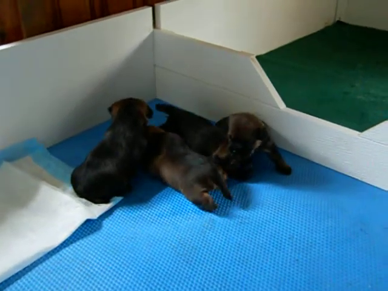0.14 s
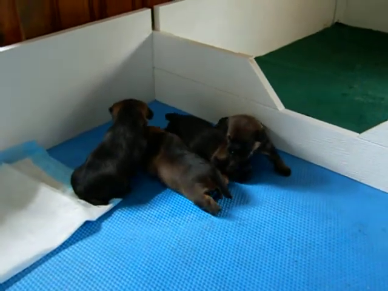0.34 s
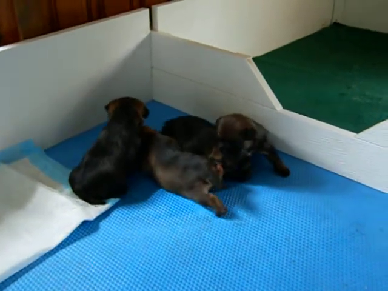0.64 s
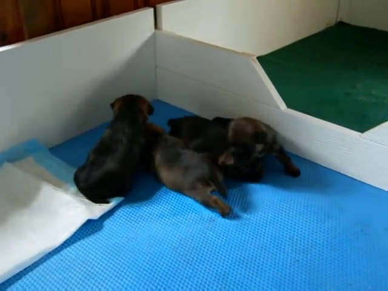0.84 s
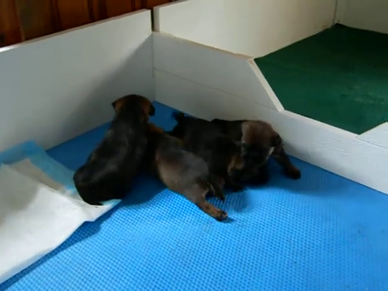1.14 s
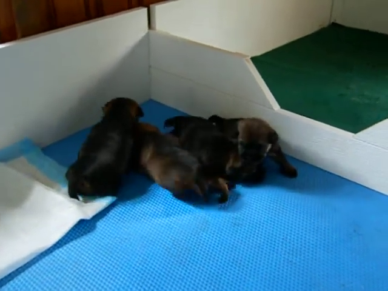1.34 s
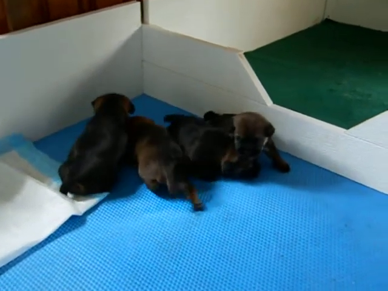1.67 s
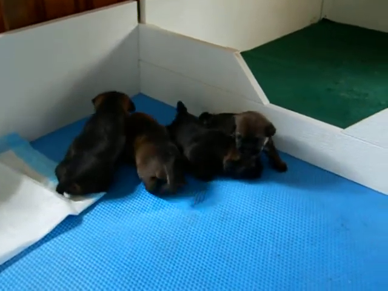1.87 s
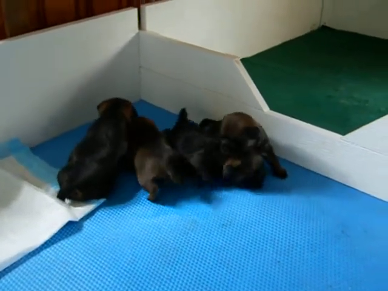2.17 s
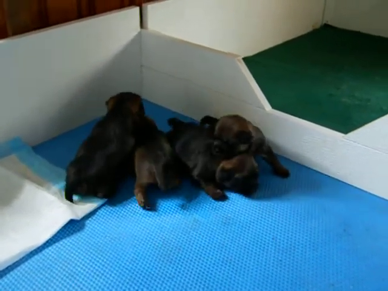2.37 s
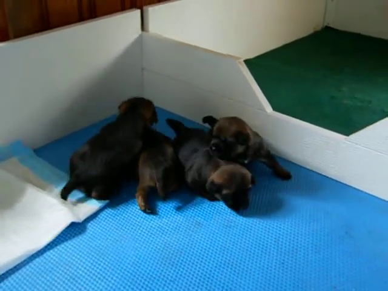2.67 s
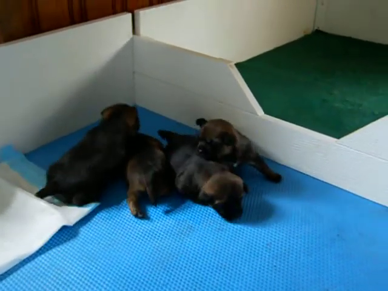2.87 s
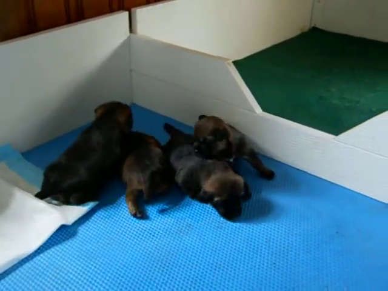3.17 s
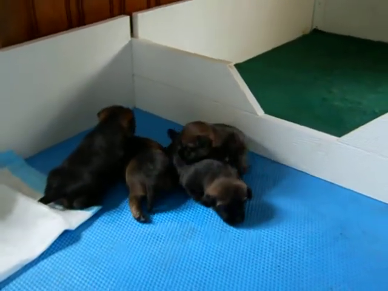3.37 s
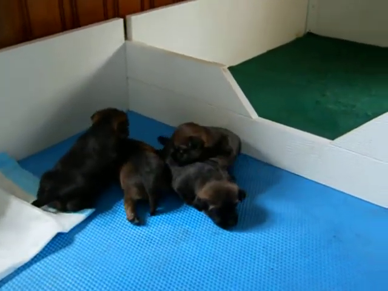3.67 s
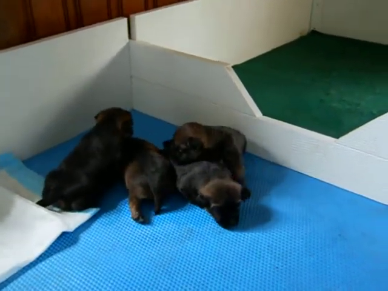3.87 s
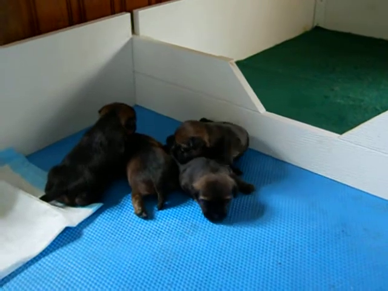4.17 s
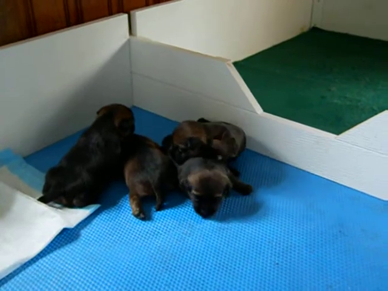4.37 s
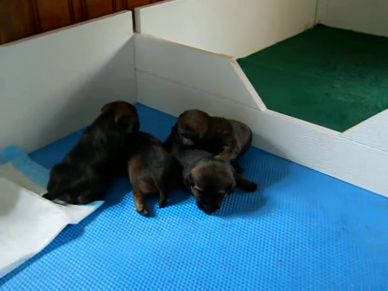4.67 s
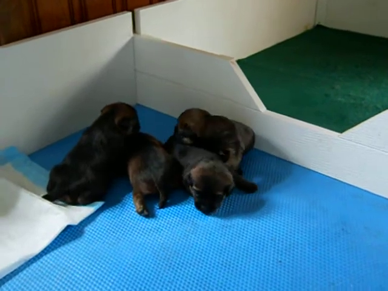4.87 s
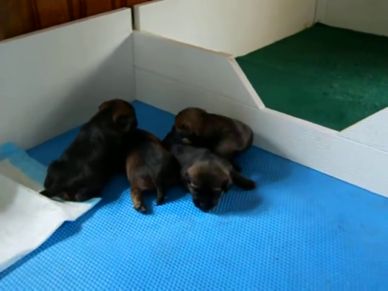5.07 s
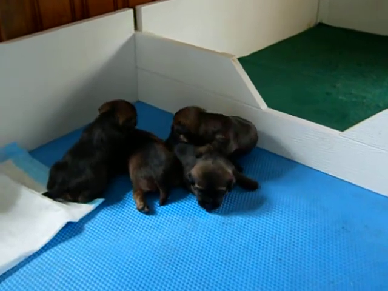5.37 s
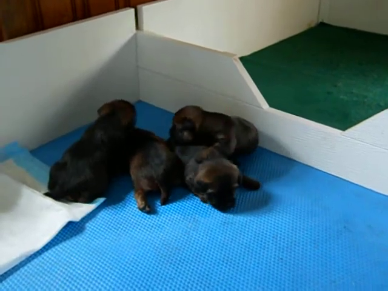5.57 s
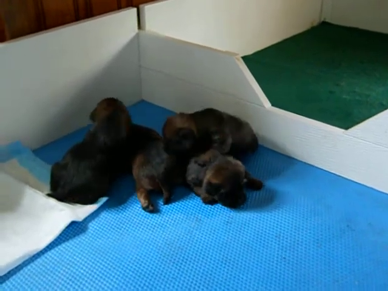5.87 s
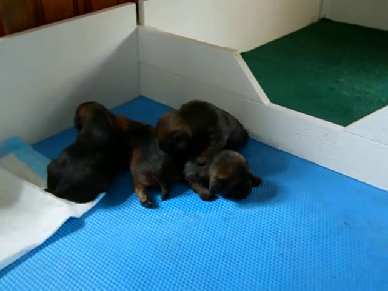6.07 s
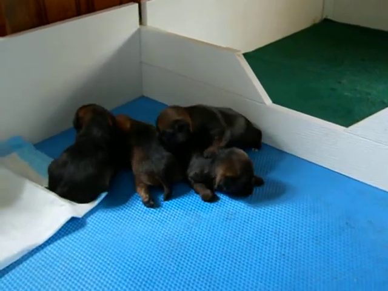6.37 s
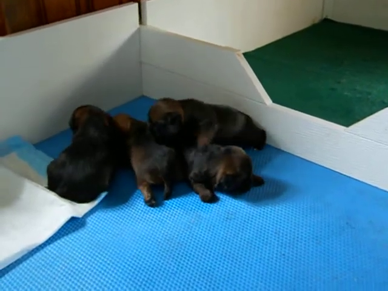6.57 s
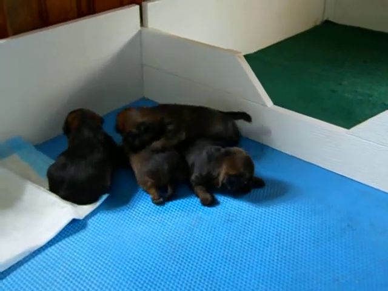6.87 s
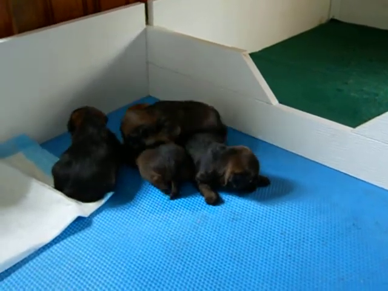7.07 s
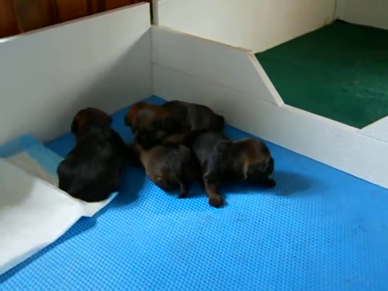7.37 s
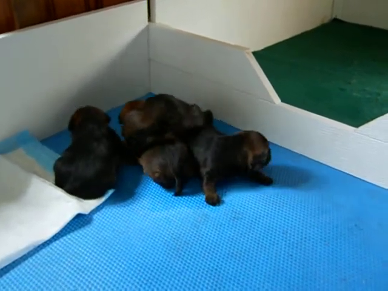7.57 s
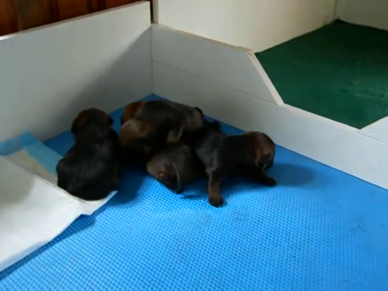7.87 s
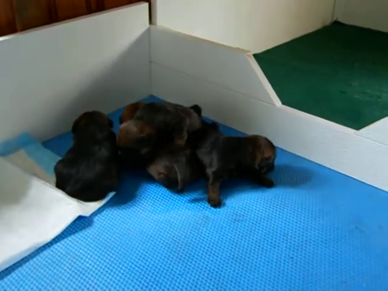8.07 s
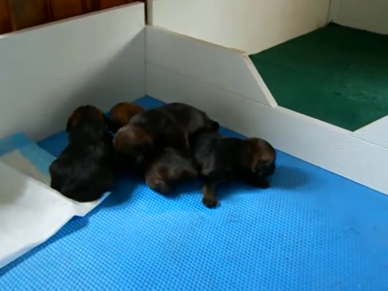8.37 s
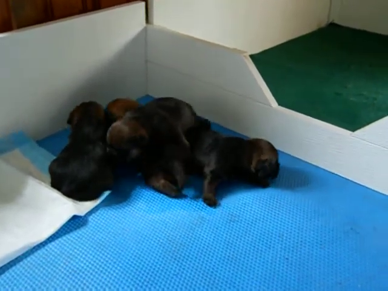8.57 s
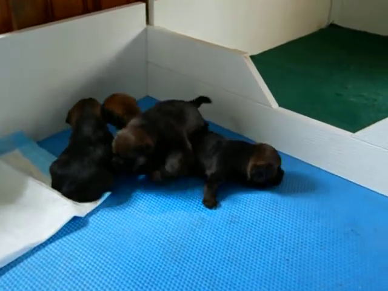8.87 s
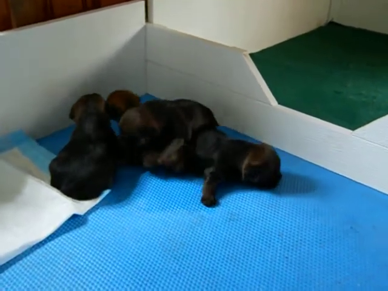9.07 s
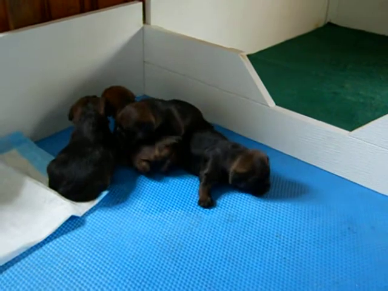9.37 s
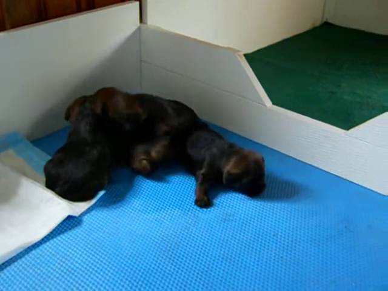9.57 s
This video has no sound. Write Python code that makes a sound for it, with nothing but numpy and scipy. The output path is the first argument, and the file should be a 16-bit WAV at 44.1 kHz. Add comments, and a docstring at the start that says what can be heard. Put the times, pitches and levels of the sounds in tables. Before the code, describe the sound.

Young puppies squeak, whine and grunt, then give a throbbing wail that sinks into a small growl, with paws scuffing a rubber mat.

```python
"""Young puppies in a wooden whelping pen, a metre or two from a small microphone.
Over the room's hiss and an appliance's hum, paws scuff the rubber mat; a hoarse peep, a claw tick
and soft grunts follow. From two seconds in, vocal folds whistle in near-pure glides: squeaks, whines,
then a throbbing wail and a low moan that sink into a growl of slack, flapping folds. Stray grunts,
scuffs and ticks close the scene. The pen boards and room walls throw back short echoes throughout."""
import sys
import numpy as np
from scipy import signal
from scipy.fft import rfft, irfft
from scipy.io import wavfile

SR = 44100
rng = np.random.default_rng(int(sys.argv[2]) if len(sys.argv) > 2 else 0)


def log_audio(samples):
    """Write samples as a 16-bit WAV file to the path given in sys.argv[1]."""
    # one column per channel
    frames = np.atleast_2d(samples).T
    # limit to full scale, then quantise
    limited = np.clip(frames, -1, 1)
    pcm = np.round(limited * 32767).astype(np.int16)
    wavfile.write(sys.argv[1], SR, pcm)


N = 429516
BIN_HZ = np.maximum(np.fft.rfftfreq(N, 1 / SR), 1)
PURE, CLEAR, HUSKY, RASPY, CRACKED = .015, .05, .12, .22, .5  # hoarseness of a voice, 0-1


def undb(db):
    """Decibels to gain."""
    return 10 ** (np.asarray(db) / 20)


def unit(x):
    """Scale to rms 1."""
    return x / np.sqrt(np.mean(x ** 2) + 1e-18)


def gain_at(hz, points):
    """Gain of a (frequency [Hz], level [dB]) outline on a log-frequency axis."""
    points_hz, db = np.transpose(points)
    return undb(np.interp(np.log(hz), np.log(points_hz), db))


def band(x, hz, width_hz):
    """A resonance applied twice, for steep flanks."""
    b, a = signal.iirpeak(hz, hz / width_hz, fs=SR)
    return signal.lfilter(b, a, signal.lfilter(b, a, x))


def wander(size, hz):
    """Smooth random drift of rms 1, changing up to about hz times a second."""
    lowpass = signal.butter(2, hz, fs=SR, output="sos")
    return unit(signal.sosfilt(lowpass, rng.standard_normal(size + SR // 10))[-size:])


def add(out, start, x):
    """Mix x into out at a time in seconds."""
    i = max(int(start * SR), 0)
    out[i:i + len(x)] += x[:len(out) - i]


def room_tone(air_db=-39, hum_db=5, waver=.1):
    """Even hiss and the slightly wavering hum of a household appliance."""
    # spectrum of the hiss: (frequency [Hz], relative density [dB])
    air_spectrum = [(20, -6.5), (60, -8), (90, -14), (125, -3.5), (160, -11), (350, -10), (720, -11.5),
                    (1280, -14), (3000, -16.5), (7400, -20)]
    # tones of the appliance: (frequency [Hz], relative level [dB])
    hum_tones = [(59.2, -60.5), (118.4, -58.5), (199.2, -56.5)]
    spectrum = rfft(rng.standard_normal(N)) * gain_at(BIN_HZ, air_spectrum)
    air = irfft(spectrum, N) / np.std(irfft(spectrum * (BIN_HZ > 250), N))  # rms 1 above 250 Hz
    hum, t = np.zeros(N), np.arange(N) / SR
    for hz, db in hum_tones:
        level = undb(db) * (1 + waver * wander(N, 8.6))
        hum += level * np.sin(2 * np.pi * hz * t + .32 * wander(N, 5.2))
    return undb(air_db) * air + np.sqrt(2) * undb(hum_db) * hum


def scuffs(grain_db=4, centre_hz=4000, width_hz=5500):
    """A paw drags over the ribbed mat: grainy friction that swells fast and dies away."""
    # paw strokes: (start [s], half-length [s], relative level [dB])
    strokes = [(0.037, 0.098, -41), (0.206, 0.077, -41), (.49, 0.065, -43.5), (0.727, 0.16, -40.5),
               (1.009, 0.042, -34.5), (1.245, 0.1, -41.5), (1.366, 0.083, -39), (1.796, 0.042, -40),
               (1.837, 0.069, -38.5), (2.12, 0.073, -42), (2.303, 0.094, -42.5), (6.606, 0.029, -40),
               (6.78, 0.042, -39), (7.043, .03, -35), (7.104, 0.032, -38), (8.107, 0.022, -38.5),
               (9.156, 0.033, -39), (9.618, 0.017, -39)]
    out = np.zeros(N)
    for start, half_length, db in strokes:
        progress = np.linspace(0, 1, int(2 * half_length * SR))
        grains = rng.standard_normal(len(progress)) * undb(grain_db * wander(len(progress), 250))
        swell = np.interp(progress, [0, .12, .4, .65, 1], [.65, 1, 1, .1, .33])
        add(out, start, unit(band(grains, centre_hz, width_hz)) * swell * undb(db))
    return out


def pen(x, room_db=-12, gap_s=.0048, t60_s=.26):
    """Hard boards give a few close echoes; the room adds a short tail."""
    # echoes off the pen boards and room walls: (delay [s], level re direct sound [dB])
    echoes = [(.0031, -22.5), (.0078, -13), (0.0131, -15.5), (.022, -10.5)]
    t = np.arange(SR // 2) / SR
    tail = rng.standard_normal(len(t)) * np.exp(-np.log(1000) * t / t60_s) * (t > gap_s)
    response = undb(room_db) * tail / np.linalg.norm(tail)
    response[0] = 1
    for delay, db in echoes:
        response[int(delay * SR)] += undb(db)
    return signal.fftconvolve(x, response / np.linalg.norm(response))[:N]


def cry(glide, hoarse, octave_db, bright_db, quiver, tract=(), throbs=None,
        open_db=-50, mouth_hz=4900, mouth_width_hz=1000, edge_s=.005, catch_s=.022):
    """The vocal folds whistle on a gliding pitch, quiver, and turn uneven when the voice is hoarse."""
    # the voice roughens as it sinks: (pitch [Hz], extra roughness [0-1])
    sinking = [(420, .16), (800, .1), (1000, 0)]
    # upper harmonics as throat and muzzle pass them: (frequency [Hz], gain [dB])
    muzzle_response = [(1200, -7), (1900, -13), (2600, -16.5), (3300, -27), (4500, -35), (6000, -25.5),
                       (7200, -20.5), (8000, -12), (9500, -25)]
    times, pitches, levels = np.transpose(glide)
    t = np.arange(times[0] - edge_s / 2, times[-1] + edge_s / 2, 1 / SR)
    hz, db = np.interp(t, times, pitches), np.interp(t, times, levels)
    from_edge = np.minimum(t - t[0], t[-1] - t)
    catch = .25 * np.exp(-from_edge / catch_s)  # the folds catch as the cry starts and stops
    rough = hoarse + catch + np.interp(hz, *np.transpose(sinking))
    # the octave swells across resonances of nose and throat, and thins away at high pitch
    swell_db = sum(boost * np.exp(-((2 * hz - centre) / width) ** 2) for centre, width, boost in tract)
    thin_db = .03 * np.maximum(hz - 1850, 0)
    fundamental, octave = undb(db), undb(db + octave_db + swell_db - thin_db)
    effort = np.hypot(fundamental, octave)
    jitter = .07 * rough * wander(len(t), 330)
    tremble = throb(t, *throbs) if throbs else 0
    hz = hz * (1 - tremble + quiver * wander(len(t), 46) + jitter)
    phase = 2 * np.pi * np.cumsum(hz) / SR
    voice = fundamental * np.sin(phase) + octave * np.sin(2 * phase)
    # at low pitch, slack folds alternate strong and weak cycles, which sounds between the harmonics
    slack = np.clip((1400 - hz) / 300, 0, 1)
    voice += .5 * rough * slack * effort * (np.sin(1.5 * phase) + .5 * np.sin(2.5 * phase))
    dull = undb(-.17 * np.maximum(520 - hz, 0))  # the mouth closes below 520 Hz
    for k in range(3, 8):
        # upper harmonics weaken, but swell across a resonance of the open mouth or the muzzle
        mouth = undb(open_db) / (k - 2) * np.exp(-((k * hz - mouth_hz) / mouth_width_hz) ** 2)
        muzzle = undb(bright_db - 2 * (k - 3.5)) * gain_at(k * hz, muzzle_response)
        voice += effort * dull * (muzzle + mouth) * (k * hz < SR / 4) * np.sin(k * phase)
    rattle = undb(4 * rough * slack * wander(len(t), 70))
    shimmer = 1 + .7 * rough * wander(len(t), 340)
    fade = np.minimum(from_edge / edge_s, 1)
    out = np.zeros(N)
    add(out, t[0], np.sqrt(2) * voice * rattle * shimmer * fade)
    return out


def peeps(attack_s=.014, release_s=.025, sag_db=-2.5, edge_db=-10):
    """A peep is a short cracked cry: attack, a sagging hold on a straight glide, release."""
    # small hoarse calls: (start [s], length [s], first pitch [Hz], last pitch [Hz], level [dB])
    calls = [(0.749, 0.091, 1058, 1018, -37), (3.415, 0.1, 999, 1098, -33), (3.877, .12, 1290, 1217, -33.5)]
    out = np.zeros(N)
    for start, length, first_hz, last_hz, db in calls:
        end = start + length
        glide = [(start, first_hz, db + edge_db), (start + attack_s, first_hz, db),
                 (end - release_s, last_hz, db + sag_db), (end, last_hz, db + edge_db)]
        out += cry(glide, CRACKED, octave_db=-14.5, bright_db=-3, quiver=.022)
    return out


def claw_ticks(width_hz=3200):
    """A claw snaps free of the mat or a board: a bright burst, gone in a few milliseconds."""
    # claw snaps: (time [s], level [dB], centre [Hz], decay [s])
    snaps = [(1.229, -36, 4500, .004), (1.789, -25, 3300, .0035), (7.859, -24, 6300, .0025),
             (9.533, -25, 5600, .002)]
    out, t = np.zeros(N), np.arange(SR // 25) / SR
    for start, db, hz, decay in snaps:
        snap = unit(band(rng.standard_normal(len(t)), hz, width_hz))
        add(out, start, undb(db) * snap * np.exp(-t / decay))
    return out


def grunt(out, start, db, chest_db, mouth_db, length, edge_s=.005, flap_hz=260, breath=.25):
    """Mix in one grunt: a short run of irregular flaps of slack folds rings chest, throat and mouth."""
    # resonances of each cavity: (frequency [Hz], width [Hz], relative level [dB])
    chest = [(328, 50, 0), (402, 42, -4)]
    throat = [(660, 70, -1), (825, 60, 0), (1090, 260, -4)]
    mouth = [(1750, 700, -7), (2450, 750, 0)]
    t = np.arange(SR // 8) / SR
    gate = np.minimum(t / edge_s, 1) * np.exp(-np.maximum(t - length / 2, 0) / edge_s)
    rate_hz = flap_hz * np.exp(.54 * wander(len(t), 300))
    flaps = np.diff(np.floor(np.cumsum(rate_hz) / SR), prepend=0)  # one pulse a cycle
    push = gate * (unit(flaps) + breath * rng.standard_normal(len(t)))
    for modes, cavity_db in ((chest, chest_db - 2), (throat, -7.5), (mouth, mouth_db - 4.5)):
        # the throat is never shaped twice alike
        ring = sum(undb(mode_db + 2 * rng.standard_normal()) * band(push, hz, width)
                   for hz, width, mode_db in modes)
        add(out, start - .003, unit(ring) * np.sqrt(length / t[-1]) * undb(db + cavity_db))


def grunts():
    """Single soft grunts, scattered through the scene: before the crying, at the start of the moan, and after
    it."""
    # grunts: (time [s], relative level [dB], chest trim [dB], mouth trim [dB], length [s])
    calls = [(1.562,-34,-15,-8,.03), (1.61,-30,.5,-8,.028), (6.242,-33,-10,-2,.026),
             (6.298,-24,-21,-10,.025), (7.367,-28,-12,-13,.018), (7.617,-32,-15,-14,.02),
             (7.819,-27,-9,-22,.03), (7.847,-27,-16,-17,.02), (8.824,-31,-12,-9,.04),
             (9.649,-29,-6,-21,.022)]
    out = np.zeros(N)
    for call in calls:
        grunt(out, *call)
    return out


def squeals():
    """The highest cries, thin as whistles: a squeak, a pure yelp and later a husky whistle."""
    # glides of the voice: (time [s], pitch [Hz], level [dB])
    squeak = [(2.18, 1614, -39), (2.208, 1540, -37.5), (2.242, 2290, -28.5), (2.272, 2435, -17),
              (2.32, 2470, -46)]
    yelp = [(2.485, 1756, -42), (2.5, 1910, -26.5), (2.515, 2207, -19.5), (2.545, 2325, -13.5),
            (2.588, 2347, -11), (2.6, 2367, -18), (2.632, 2380, -21), (2.648, 2480, -23.5),
            (2.662, 2720, -38)]
    whistle = [(5.138, 2460, -39), (5.143, 2300, -23), (5.163, 2040, -37), (5.173, 2242, -22.5),
               (5.228, 2234, -25), (5.26, 2030, -31), (5.285, 2175, -30), (5.326, 2197, -24),
               (5.365, 2126, -40)]
    # nose and throat resonance: (centre [Hz], width [Hz], octave boost [dB])
    squeak_tract = [(3100, 400, 23)]
    return (cry(squeak, CLEAR, octave_db=-27, bright_db=-1, quiver=.0073, tract=squeak_tract)
            + cry(yelp, PURE, octave_db=-7.5, bright_db=1.5, quiver=.0019)
            + cry(whistle, HUSKY, octave_db=-30, bright_db=-10.5, quiver=.008))


def whimpers():
    """Clear, lower cries: a falling whine, a wavering whimper and a short falling mew."""
    # glides of the voice: (time [s], pitch [Hz], level [dB])
    whine = [(2.875, 1683, -40), (2.903, 1684, -34), (2.947, 1492, -33.5), (3.087, 1609, -30.5),
             (3.105, 1427, -28.5), (3.143, 1426, -29), (3.175, 1350, -28), (3.233, 1058, -28),
             (3.369, 1020, -27.5), (3.39, 1020, -40)]
    whimper = [(3.995, 867, -39), (4.025, 903, -42), (4.052, 1060, -24.5), (4.086, 963, -37),
               (4.122, 1044, -23), (4.168, 1110, -36.5), (4.205, 978, -27), (4.24, 944, -47)]
    mew = [(4.6, 1682, -42), (4.604, 1662, -36), (4.68, 1604, -33), (4.734, 1194, -26), (4.758, 1060, -35),
           (4.77, 1115, -42)]
    # nose and throat resonances: (centre [Hz], width [Hz], octave boost [dB])
    whine_tract = [(3020, 690, 14), (2320, 170, 15.5)]
    whimper_tract = [(2233, 90, 23.5)]
    mew_tract = [(2350, 640, 19.4)]
    return (cry(whine, CLEAR, octave_db=-21.5, bright_db=.5, quiver=.0053, tract=whine_tract)
            + cry(whimper, CLEAR, octave_db=-16.5, bright_db=1, quiver=.01, tract=whimper_tract)
            + cry(mew, CLEAR, octave_db=-27, bright_db=-9, quiver=.0046, tract=mew_tract))


def throb(t, dip_s, rate_hz, depth, build_s, settle_s):
    """A regular tremble of the pitch that builds up after the cry starts and settles as it ends."""
    swell = np.clip(np.minimum((t - t[0]) / build_s, (t[-1] - t) / settle_s), 0, 1)
    return depth * swell * np.cos(2 * np.pi * rate_hz * (t - dip_s))


def wail():
    """A husky, throbbing cry from a wide open mouth."""
    # glide of the voice: (time [s], pitch [Hz], level [dB])
    glide = [(5.535, 1588, -30.5), (5.56, 1740, -32), (5.61, 1928, -21), (5.66, 1930, -26),
             (5.7, 1680, -36.5), (5.73, 1578, -27.5), (5.77, 1620, -33), (5.83, 1693, -26),
             (5.94, 1385, -29), (6.01, 1475, -29), (6.07, 1197, -34)]
    # nose and throat resonances: (centre [Hz], width [Hz], octave boost [dB])
    tract = [(3580, 203, 13.8), (2760, 290, 11)]
    # tremble: (time of one dip [s], rate [Hz], depth [share of pitch], build-up [s], settling [s])
    throbs = (5.725, 23.4, .065, .25, .06)
    return cry(glide, HUSKY, octave_db=-15, bright_db=-2, quiver=.0059, tract=tract, throbs=throbs,
               open_db=-15.5, mouth_hz=4470)


def growls(grunt_s=.022, uneven=.15, slowing_s=.00068, chest_db_per_s=15, mouth_db_per_s=-10):
    """A growl is a string of uneven grunts that slows as the mouth closes: more chest, less mouth."""
    # growls: (start [s], end [s], first rate [Hz], first chest trim [dB], first mouth trim [dB])
    strings = [(5.855, 6.22, 27.65, -22, -13.5), (6.391, 6.6, 26.8, -18, -14),
               (6.88, 7.36, 25.35, -14, -15.5)]
    # force of the growling: (time [s], relative level [dB])
    force = [(5.855, -14), (6.05, -13.5), (6.21, -31), (6.39, -23), (6.44, -19), (6.5, -18), (6.58, -22),
             (6.88, -23), (6.92, -15.5), (7, -16), (7.13, -22.5), (7.25, -22), (7.31, -19.5)]
    out = np.zeros(N)
    for start, end, rate_hz, chest_db, mouth_db in strings:
        now, gap = start, 1 / rate_hz
        while now < end:
            age = now - start
            db = np.interp(now, *np.transpose(force))
            length = grunt_s * np.exp(uneven * rng.standard_normal())
            grunt(out, now, db, chest_db + chest_db_per_s * age, mouth_db + mouth_db_per_s * age, length)
            now += gap
            gap += slowing_s
    return out


def moan():
    """The longest cry: raspy and throbbing, it starts open-mouthed and sinks into the growl."""
    # glide of the voice: (time [s], pitch [Hz], level [dB])
    glide = [(6.24, 1041, -38), (6.29, 1175, -33), (6.335, 1070, -30.5), (6.37, 911, -35),
             (6.44, 790, -30.5), (6.53, 596, -39), (6.65, 463.7, -38), (6.72, 430.5, -31), (6.83, 391, -31),
             (6.875, 322, -34.5)]
    # nose and throat resonances: (centre [Hz], width [Hz], octave boost [dB])
    tract = [(2270, 160, 7.3), (1082, 213, 13.4)]
    # tremble: (time of one dip [s], rate [Hz], depth [share of pitch], build-up [s], settling [s])
    throbs = (6.263, 20.66, .075, .12, .45)
    return cry(glide, RASPY, octave_db=-3, bright_db=-2.5, quiver=.0159, tract=tract, throbs=throbs,
               open_db=-6, mouth_hz=2650, mouth_width_hz=430)


def scene(scuff_db=-1):
    """The litter in its pen from a metre or two away, in mono, over the room tone."""
    voices = whimpers() + squeals() + wail() + moan() + peeps() + grunts() + growls()
    paws = undb(scuff_db) * scuffs() + claw_ticks()
    return (pen(voices + paws) + room_tone())[None]


def record(dry, top_hz=8900):
    """A small microphone whose treble falls away steeply."""
    # treble loss of the microphone: (frequency [Hz], gain [dB])
    mic_response = [(7200, 0), (7600, -4.5), (8000, -15.5), (8500, -18), (9000, -27)]
    coloured = irfft(rfft(dry) * gain_at(BIN_HZ, mic_response), N)
    lowpass = signal.ellip(10, .2, 80, top_hz, fs=SR, output="sos")
    return signal.sosfilt(lowpass, coloured)


dry = scene()
out = record(dry)
log_audio(out)
```